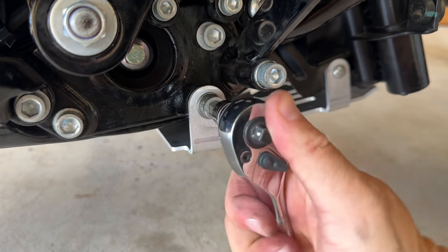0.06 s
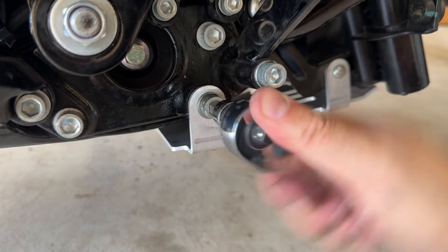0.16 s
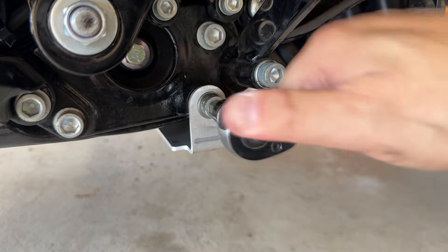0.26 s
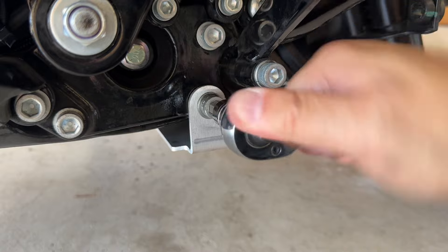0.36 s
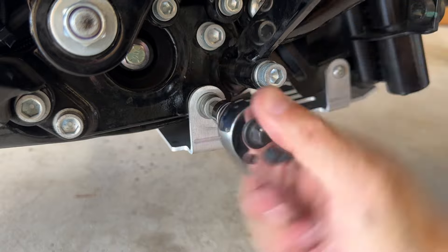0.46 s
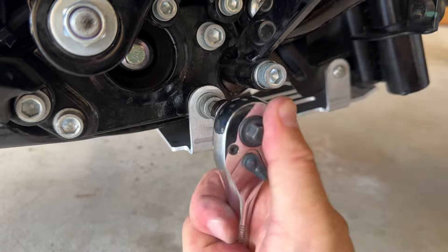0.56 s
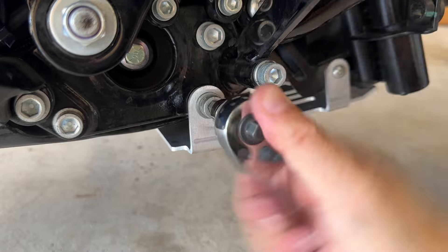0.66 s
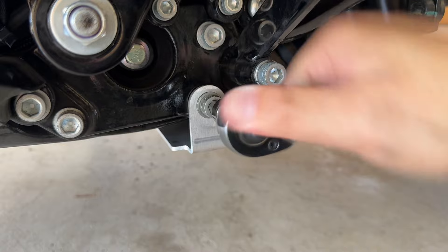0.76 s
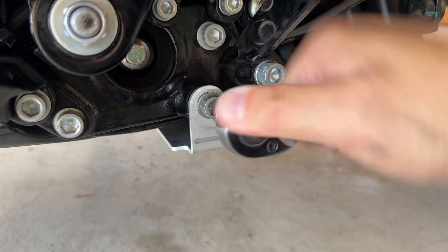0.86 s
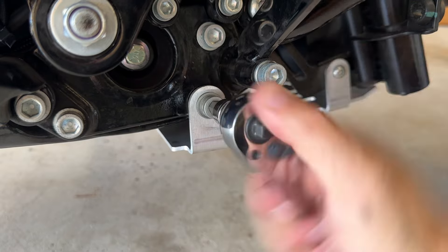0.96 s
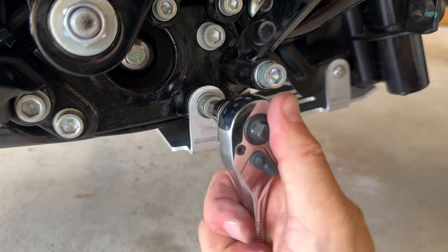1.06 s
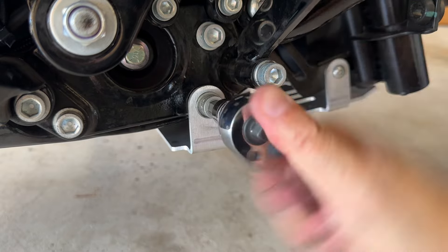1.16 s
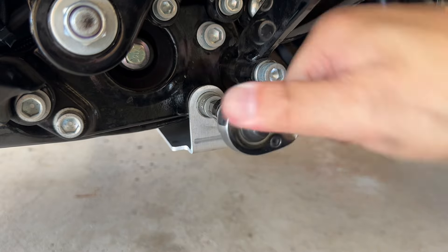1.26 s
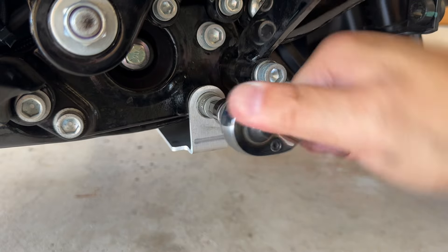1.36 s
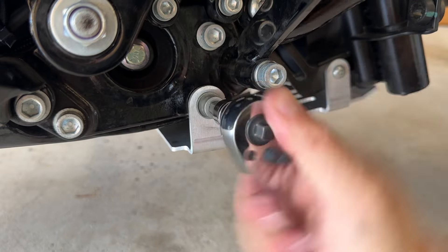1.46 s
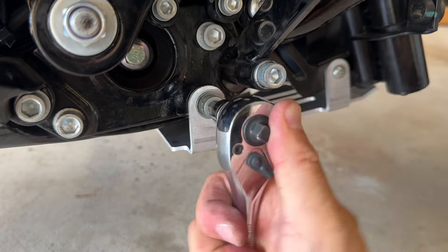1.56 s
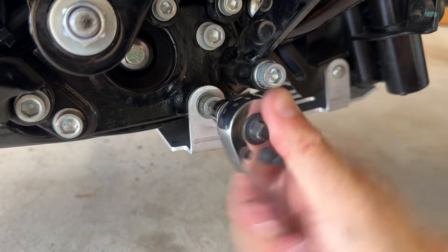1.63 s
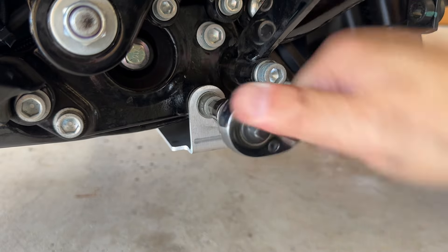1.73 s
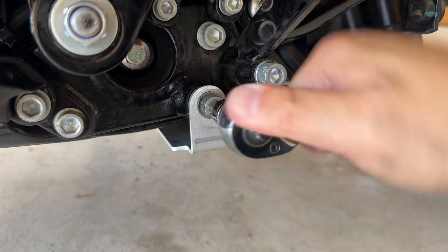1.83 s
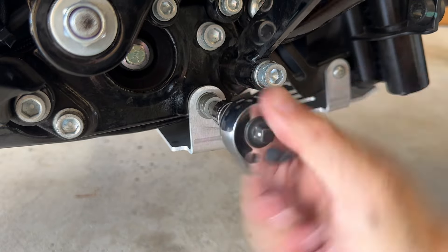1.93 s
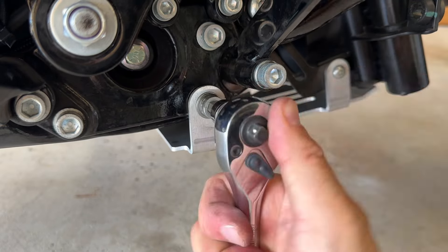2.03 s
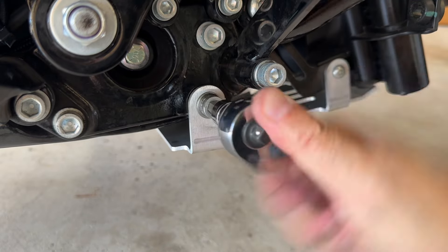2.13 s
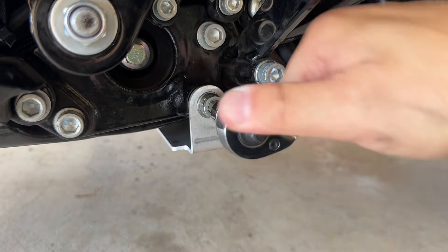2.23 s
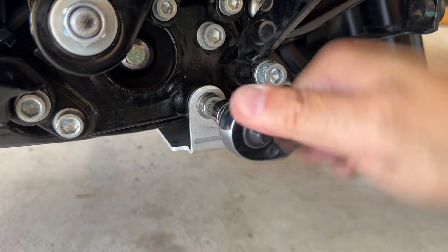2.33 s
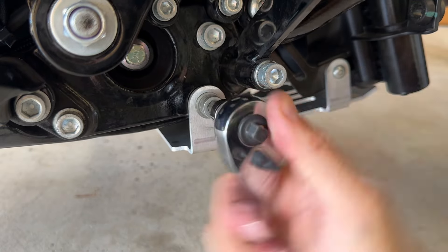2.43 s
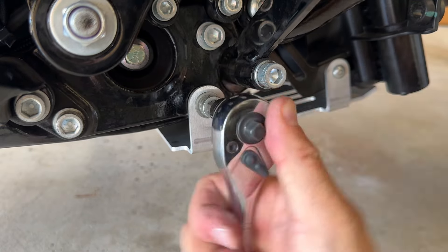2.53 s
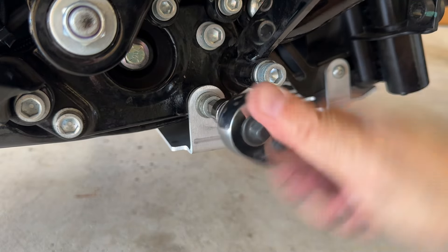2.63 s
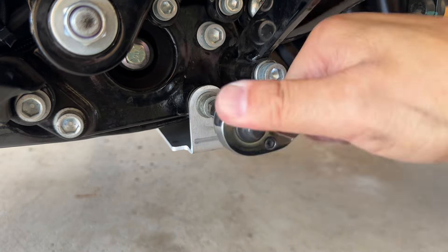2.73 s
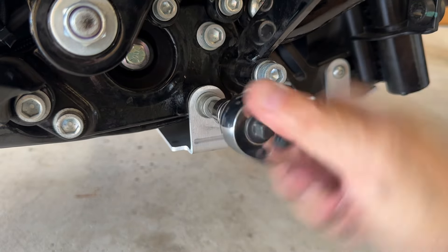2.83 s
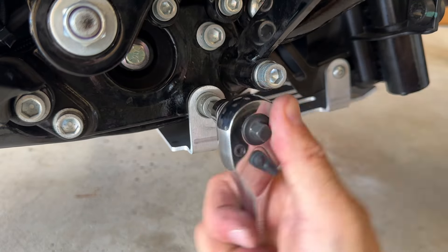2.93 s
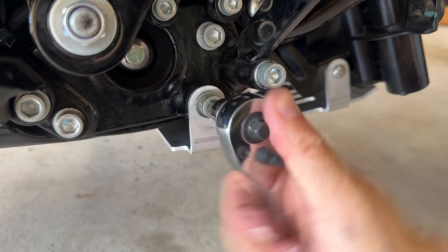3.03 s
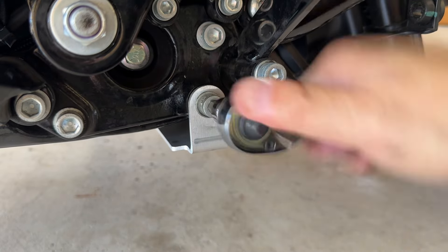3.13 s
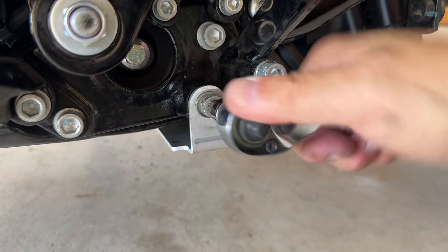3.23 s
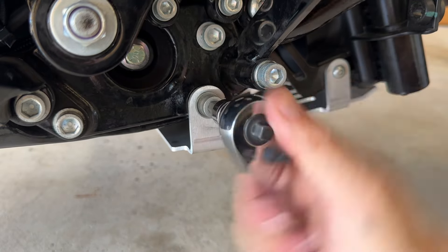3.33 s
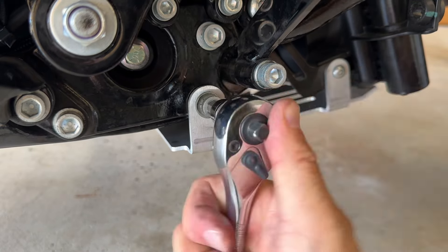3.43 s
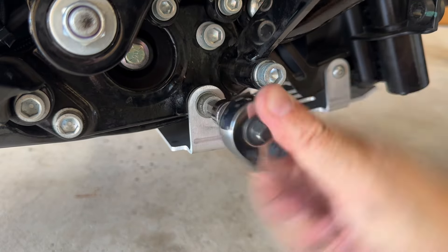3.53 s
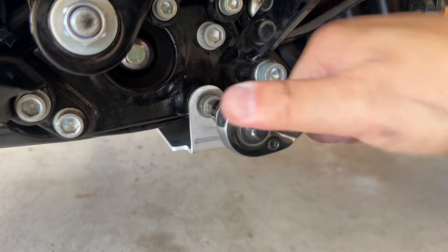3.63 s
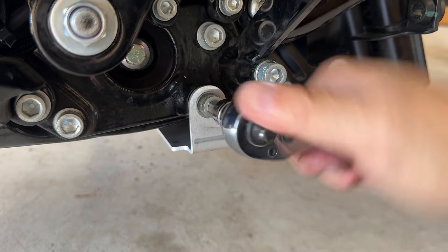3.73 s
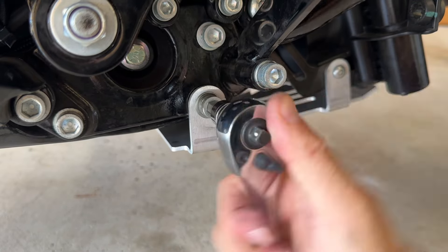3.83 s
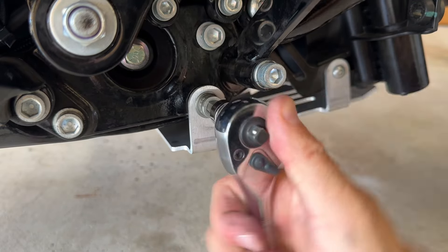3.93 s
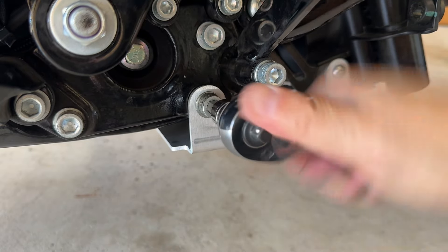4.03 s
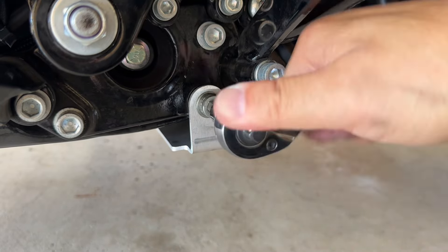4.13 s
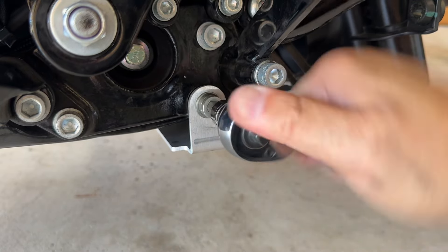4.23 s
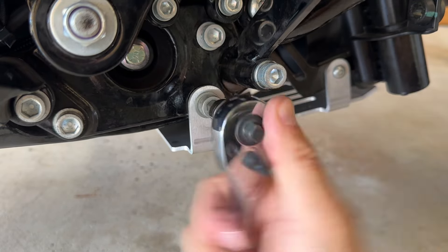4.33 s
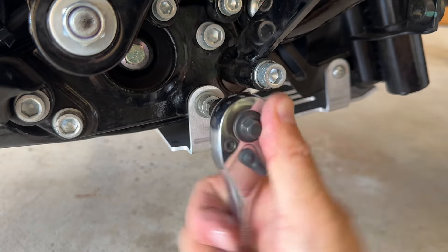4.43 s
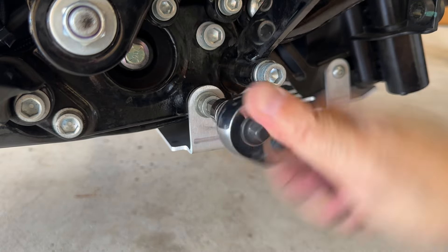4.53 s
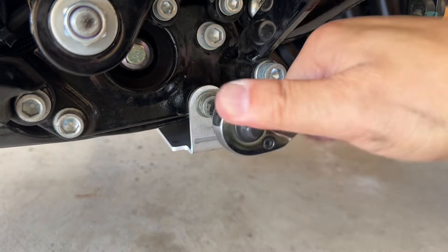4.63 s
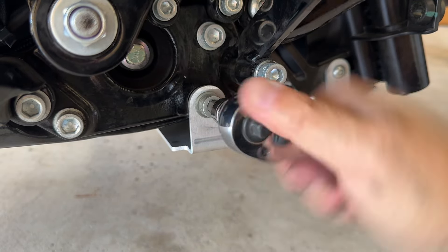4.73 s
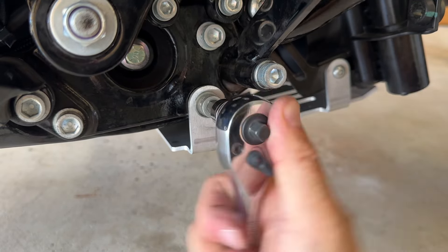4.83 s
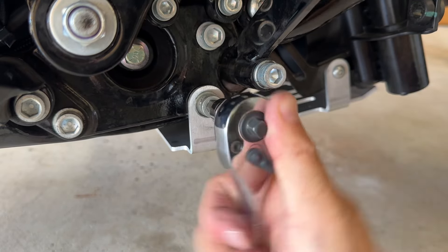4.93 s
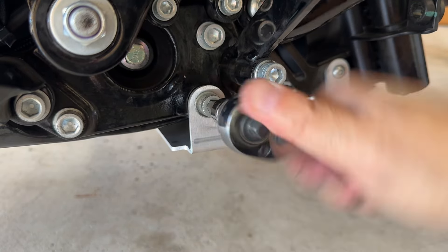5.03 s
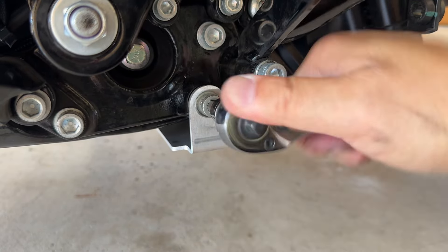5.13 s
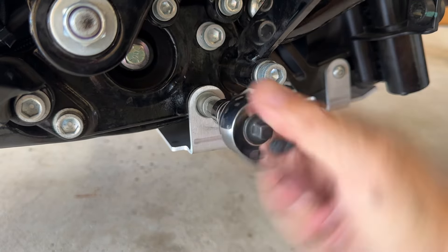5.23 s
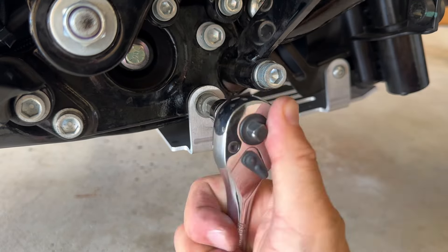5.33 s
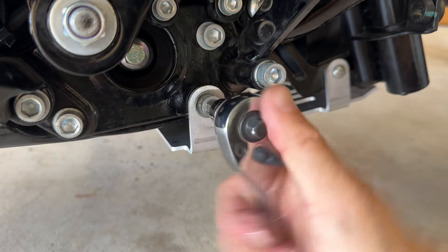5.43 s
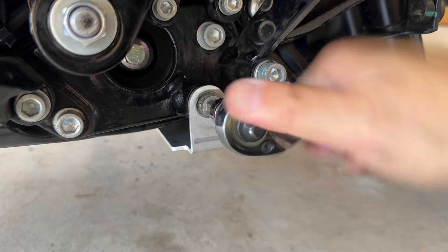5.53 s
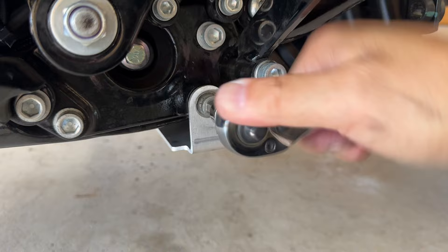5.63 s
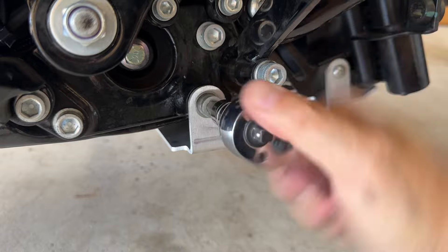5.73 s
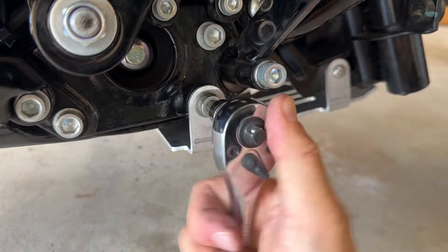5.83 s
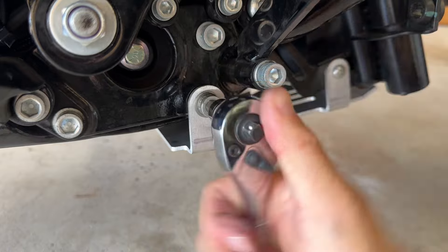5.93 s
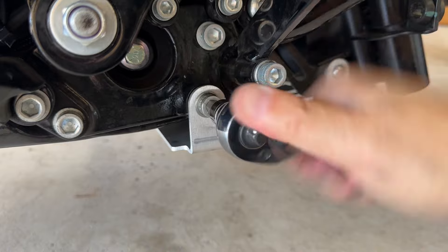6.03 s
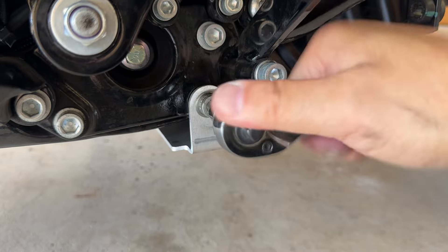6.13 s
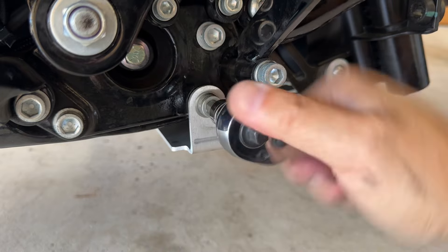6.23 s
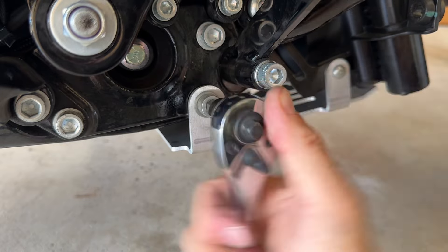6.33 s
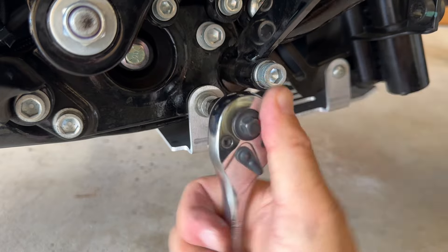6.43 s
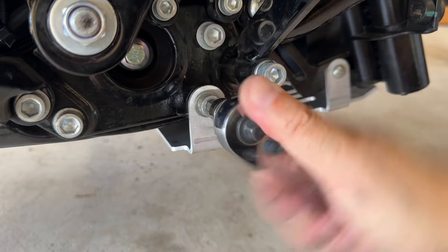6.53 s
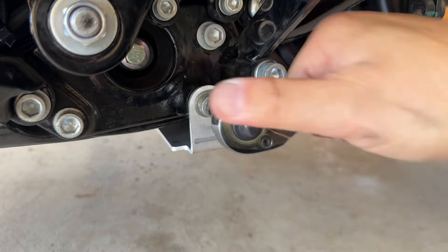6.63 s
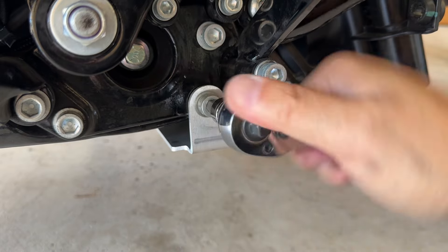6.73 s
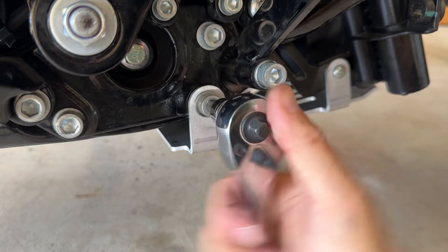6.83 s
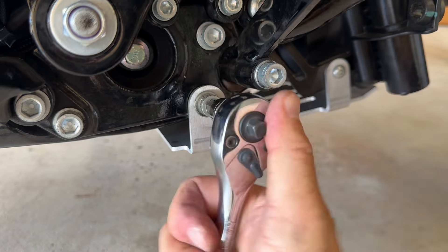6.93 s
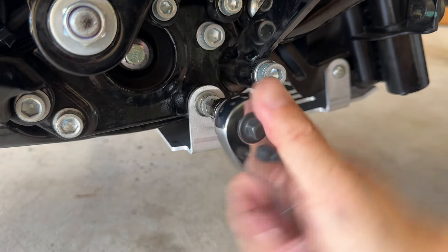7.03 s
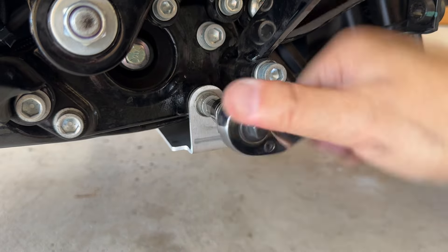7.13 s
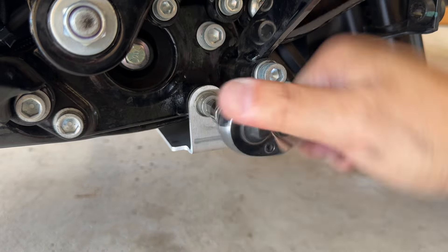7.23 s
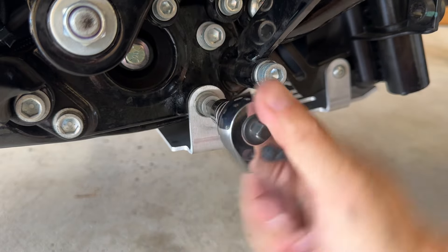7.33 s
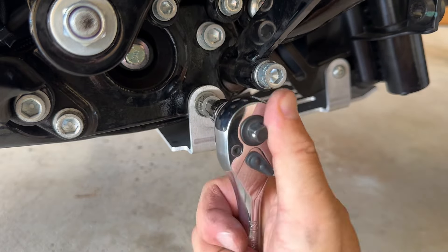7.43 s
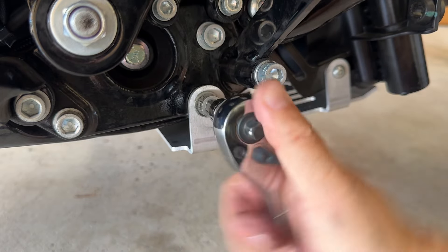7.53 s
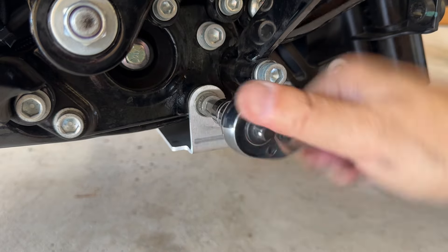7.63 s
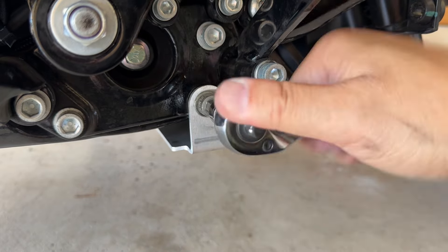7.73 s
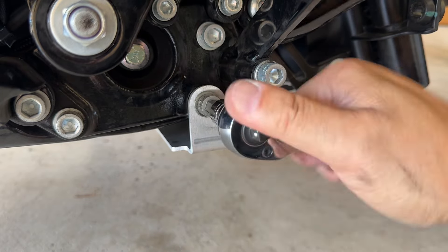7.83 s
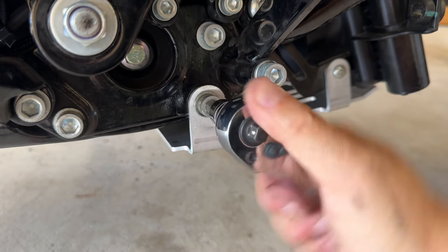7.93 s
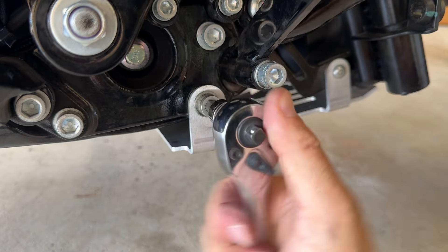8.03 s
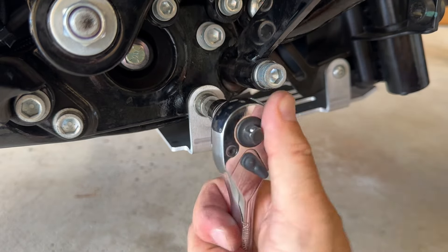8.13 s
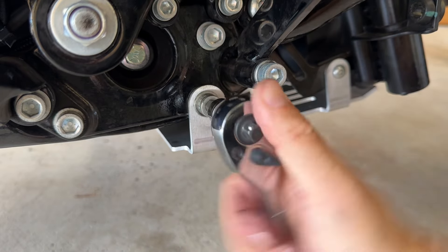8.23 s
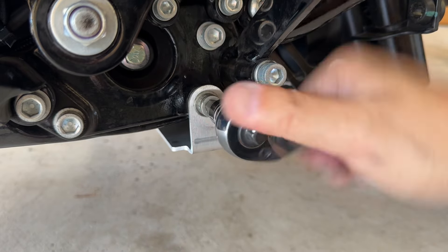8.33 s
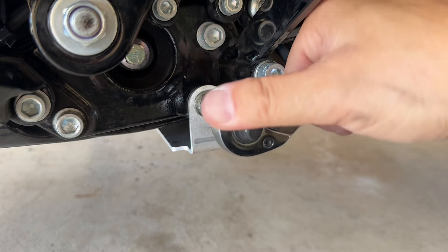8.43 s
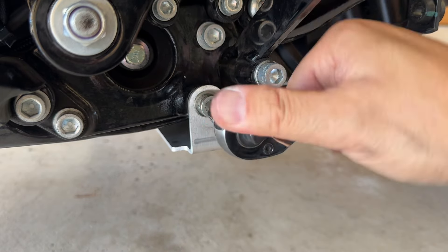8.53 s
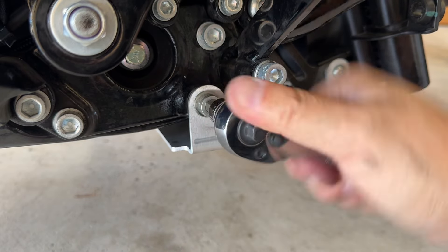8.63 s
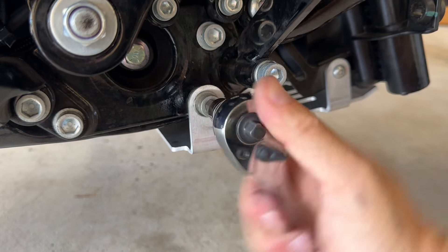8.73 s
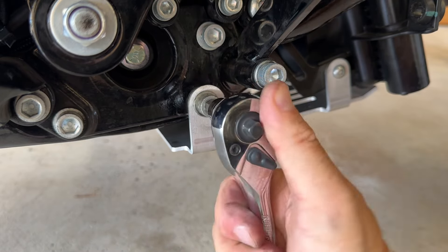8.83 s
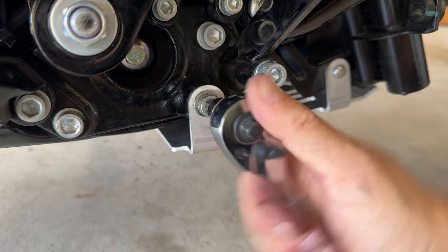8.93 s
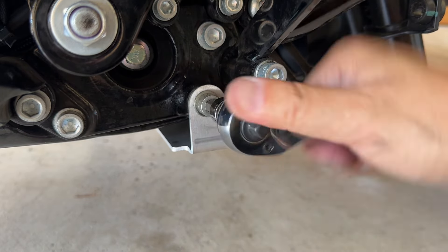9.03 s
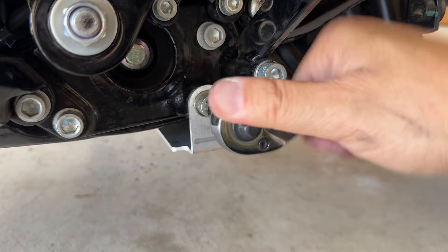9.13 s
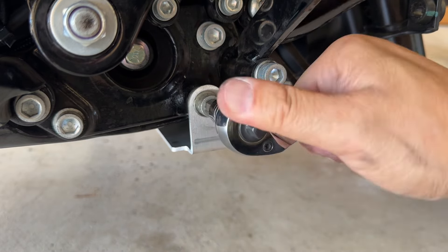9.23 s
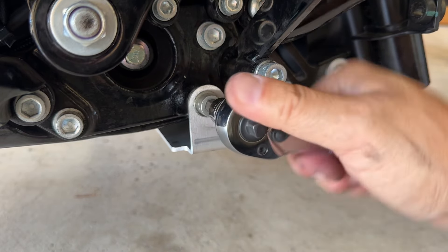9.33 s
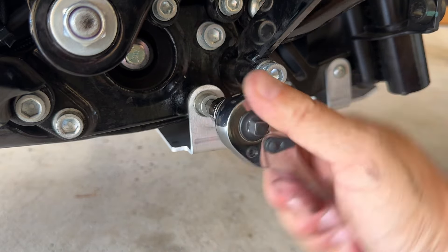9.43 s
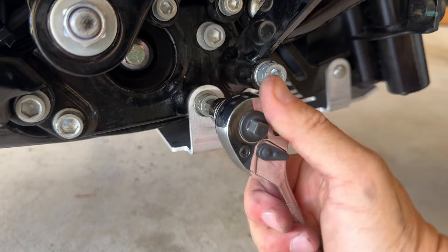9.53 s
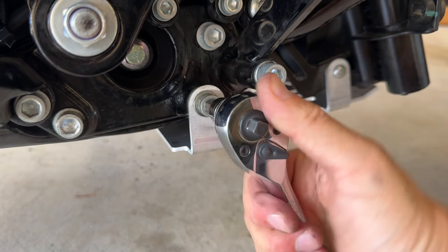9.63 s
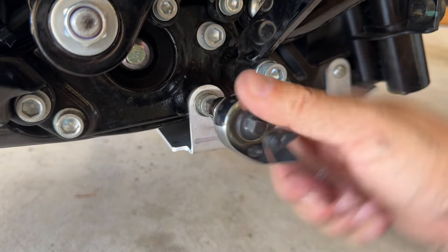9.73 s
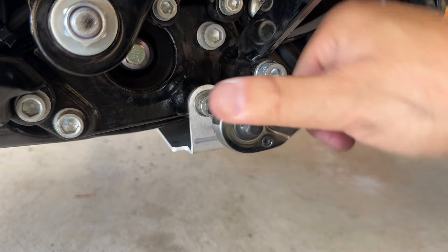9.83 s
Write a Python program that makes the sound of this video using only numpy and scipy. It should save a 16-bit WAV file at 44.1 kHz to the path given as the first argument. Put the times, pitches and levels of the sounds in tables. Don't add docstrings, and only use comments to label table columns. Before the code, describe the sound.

Regular zipping bursts of hard pawl clicks, each around an eighth of a second, come from a hand wrench tightening a bolt. The turning strokes between are nearly quiet, with small clunks as the drive takes up play and one rough grip shift near three seconds. The pace loosens towards the end. Close stereo pickup in a garage, short reflections, faint rumble and hum.

```python
import sys
import numpy as np
from scipy import signal
from scipy.fft import rfft, irfft, next_fast_len
from scipy.io import wavfile

SR = 44100
rng = np.random.default_rng(int(sys.argv[2]) if len(sys.argv) > 2 else 0)


def store_pcm(level_fs):
    pcm = np.round(np.clip(level_fs, -1, 1) * 32767).astype(np.int16)
    wavfile.write(sys.argv[1], SR, np.atleast_2d(pcm).T)


def boost_factor(decibels):
    exponent = np.asarray(decibels, float) / 20
    return 10 ** exponent


N = 435266

# hz, level_db_per_hz
ROOM_MID = [(18, -51), (30, -16), (101, 1.5), (346, -19.5), (658, -13.5), (885, -20), (1600, -16.5),
            (1900, -22.5), (7050, -36), (8180, -34.5), (8810, -67), (11000, -86), (14300, -109),
            (22000, -120)]
ROOM_SIDE = [(18, -50), (30, -14.5), (93, 1), (245, -6), (675, 1), (1560, -4.5), (1950, -9), (2150, -13.5),
             (8180, -21), (11000, -30.5), (14300, -50.5), (22000, -120)]
# centre_hz, width_hz, level_db
DRONE_BANDS = [(98.7, 17, -60), (202.4, 13.6, -64)]
# first_tooth_s, level_db, end_fade_db
STROKES = [(0.129, -15.5, 3.5), (0.623, -16, -2), (1.118, -16.5, -1), (1.612, -16, 2), (2.085, -16, 3.5),
           (2.561, -14, 4), (3.022, -16.5, -2.5), (3.484, -14, 5), (3.962, -14, 8), (4.453, -13.5, 2.5),
           (4.944, -15.5, 6), (5.418, -15.5, 3.5), (5.942, -16, 4.5), (6.467, -16.5, 0), (6.981, -16, 0),
           (7.522, -15, 0), (8.219, -15.5, 2.5), (8.916, -13.5, 5.5), (9.695, -15.5, 4)]
# time_s, level_db
CATCHES = [(0.169, -16), (0.22, -15), (0.668, -15.5), (0.74, -14.5), (1.146, -10.5), (1.621, -14.5),
           (1.657, -17), (1.716, -18), (2.116, -14), (2.189, -12.5), (2.598, -16), (2.67, -13.5),
           (3.049, -12.5), (3.096, -12), (3.53, -13), (3.968, -12), (4.036, -13.5), (4.463, -16),
           (4.523, -14), (5.026, -12), (5.458, -12.5), (5.974, -12), (6.491, -6.5), (6.564, -15),
           (7.029, -14), (7.105, -15), (7.595, -14), (8.293, -11.5), (8.986, -13), (9.718, -17.5)]
# time_s, level_db
LAST_BUT_ONE_TEETH = [(.241, -15), (.759, -15.5), (1.24, -12), (1.74, -19), (2.209, -16.5), (2.696, -17.5),
                      (3.14, -22), (3.607, -28), (4.066, -11.5), (4.587, -23), (5.07, -26), (5.548, -30),
                      (6.067, -16.5), (6.606, -16), (7.142, -11.5), (7.654, -25), (8.379, -28),
                      (9.056, -16), (9.814, -15)]
# time_s, level_db
LAST_TEETH = [(.257, -17.5), (.784, -11.5), (1.261, -11.5), (1.756, -12), (2.233, -16), (2.722, -9.5),
              (3.155, -14.5), (3.619, -21), (4.088, -21), (4.604, -23), (5.103, -14), (5.567, -16.5),
              (6.091, -14.5), (6.626, -24.5), (7.164, -16), (7.674, -21.5), (8.408, -9), (9.08, -19),
              (9.837, -15)]
# time_s, level_db, tilt_db_per_octave
TAKE_UPS = [(0.108, -38, -7.5), (0.481, -38.5, -1.5), (0.577, -23.5, -6.5), (1.093, -43.5, -12),
            (1.59, -39, -8.5), (2.033, -16, 0), (2.51, -20.5, -1.5), (2.997, -46.5, -10.5),
            (3.457, -31, -2.5), (3.937, -33.5, -3.5), (4.394, -47, -6.5), (4.412, -32.5, -8),
            (4.895, -39, -5.5), (4.917, -40, -1), (5.376, -36, -8), (5.393, -37, -7.5),
            (5.911, -38.5, -7.5), (5.933, -34, 1), (6.406, -21.5, -0.5), (6.432, -23, -2.5),
            (6.921, -63, -16), (6.939, -37.5, -6), (7.492, -43, -7), (7.501, -33, 0), (8.182, -35, -4.5),
            (8.862, -34, -4), (8.889, -38, -6), (9.664, -43, -6)]
# time_s, level_db, tilt_db_per_octave
SEATS = [(0.321, -34.5, -8), (0.851, -20.5, -4.5), (2.865, -41, 1), (3.218, -27.5, -7.5),
         (3.689, -36.5, -9.5), (4.143, -25, -6), (4.294, -51, -12), (4.656, -18.5, -5), (4.668, -21.5, -5),
         (5.626, -35, -8.5), (6.677, -20.5, -4.5), (7.209, -28.5, -7), (7.719, -13, 1), (7.949, -33.5, -9),
         (9.138, -24, -6)]
# mode_hz, level_db, t60_s, left_lead_rad
STEEL_MODES = [(1176, -13, 0.033, -0.7), (1592, -17.5, 0.11, 1.5), (2290, -12, 0.038, 0.2),
               (2424, -10.5, 0.071, 0.7), (2616, -19.5, 0.16, 1.5), (3324, -10, 0.056, 2),
               (3520, -20, 0.17, 2.7), (3851, -12, 0.0605, 4), (4130, -17, 0.091, 7.5),
               (4330, -7.5, 0.066, 2), (4650, -5.5, 0.028, 0.5), (4934, -2.5, 0.05, 0.64),
               (5410, -13.5, 0.063, 5.5), (5470, -26.5, 0.0223, -6.5), (6370, -10.5, 0.04, 0.5),
               (6914, -8, .04, 4), (6937, -7, 0.033, 0), (7700, -12, 0.07, 4.5), (9470, -9.5, 0.18, 5.5),
               (9534, -1.5, 0.027, 3), (10100, -20, 0.037, 6), (7350, -10, 0.026, 6.5), (7950, -4, 0.03, 5),
               (8700, -21.5, 0.059, 5), (8710, -8, 0.061, 7), (9980, 3, 0.027, 5), (10400, 0, 0.017, 7.5),
               (11170, -2.5, 0.02, 6), (11570, -15, 0.062, 1)]
# hz, level_db_per_hz
SNAP_MID = [(400, -18), (957, -15), (1590, -4.5), (2390, -7.5), (2850, -6.5), (4870, 2), (6910, -3),
            (7600, -12.5), (8800, -28), (9650, 11.5), (11200, -13), (11900, -13.5)]
SNAP_SIDE = [(400, -35.5), (1060, -14.5), (1920, -3), (2570, -31.5), (3240, -10.5), (5890, -17),
             (8350, 19.5), (11200, -9.5)]
# hz, t60_s
SNAP_T60 = [(600, 0.15), (2000, 0.055), (6000, .035), (12000, 0.033)]
# time_s, peak_db
PUFFS = [(0.24, -54), (0.9, -45), (2.28, -53), (2.8, -49), (3.21, -34.5), (3.41, -56), (3.71, -61.5),
         (3.98, -39.5), (4.3, -50), (5.0, -36.5), (5.09, -41.5), (5.17, -41), (5.52, -52), (5.66, -52.5),
         (6.02, -47.5), (6.27, -58), (7.83, -63.5), (8.27, -59), (9.04, -51), (9.17, -49)]
# time_s, peak_db
THUDS = [(0.41, -53), (0.79, -49.5), (2.2, -49.5), (2.33, -54.5), (2.66, -48.5), (3.21, -47), (3.71, -51.5),
         (4.07, -44.5), (4.67, -50), (5.0, -53), (5.17, -53), (5.52, -52), (5.66, -52.5), (6.18, -48),
         (6.76, -54), (7.31, -58.5), (7.83, -53), (8.55, -48.5), (9.15, -45.5), (9.865, -54)]
# start_s, length_s, start_db, end_db
RUBS = [
    (0.364, 0.19, -60, -47),
    (3.181, .29, -29.5, -37.5),
    (5.68, 0.27, -52, -55),
    (6.73, 0.21, -55.5, -55.5),
    (7.746, 0.069, -31.5, -51.5),
    (7.817, 0.15, -52, -52),
]
# low_hz, high_hz, level_db, side_share
RUB_BANDS = [(393, 820, 6.5, 0.65), (1030, 1580, 16, 0.3), (1820, 3750, 6.5, 1.6), (4270, 11000, 0.5, 0.81),
             (6920, 8900, -12, 11)]
# hz, left_minus_right_db
PORT_BALANCE = [(60, .6), (250, .6), (500, -.5), (1000, 2.8), (2000, 1.6), (4000, 4.4), (5800, 3.4),
                (7200, .4), (9500, .3), (12000, 3.2)]
# hz, sum_deficit_db, difference_deficit_db
WEAKER_LIMITS = [(1000, 12, 14), (2000, 8, 2.5), (2900, 0, 9), (3600, 6.5, 9), (5500, 7, 5), (7000, 6, 16),
                 (7800, 2.5, 18), (9200, 2.0, 20), (9900, 5, 20), (12000, 5.5, 20)]


def rms_one(x):
    return x / np.sqrt(np.mean(x ** 2) + 1e-20)


def at_hz(points, hz):
    table_hz, value = np.array(points).T
    return np.interp(np.log(hz), np.log(table_hz), value)


def band(x, low_hz, high_hz):
    return signal.sosfilt(signal.butter(2, [low_hz, high_hz], "band", fs=SR, output="sos"), x)


def coloured(spectrum):
    hz = np.maximum(np.fft.rfftfreq(N, 1 / SR), 1)
    return rms_one(irfft(rfft(rng.standard_normal(N)) * boost_factor(at_hz(spectrum, hz)), N))


def ports(mid, side):
    return np.array([mid + side, mid - side])


def drift(rate_hz):
    r = np.exp(-2 * np.pi * rate_hz * 100 / SR)
    white = rng.standard_normal(N // 100 + 502)
    slow = rms_one(signal.lfilter([1], [1, -2 * r, r * r], white)[500:])
    return np.interp(np.arange(N) / 100, np.arange(len(slow)), slow)


def smear(x, time_s):
    r = np.exp(-1 / (time_s * SR))
    return signal.lfilter([(1 - r) ** 2], [1, -2 * r, r * r], x)


def room_tone(mid_db=-50.5, side_db=-53.5, hum_hz=102.2, hum_db=-50):
    mid = boost_factor(mid_db + 2.1 * drift(7.5)) * coloured(ROOM_MID)
    hum_gain = boost_factor(hum_db + 0.99 * drift(1.7)) * 2 ** .5
    hum_phase = 2 * np.pi * hum_hz * np.arange(N) / SR + 0.87 * drift(2.5)
    mid = mid + hum_gain * np.sin(hum_phase)
    for hz, width_hz, level_db in DRONE_BANDS:
        drone = band(rng.standard_normal(N), hz - width_hz / 2, hz + width_hz / 2)
        mid = mid + boost_factor(level_db) * rms_one(drone)
    side = boost_factor(side_db + 1.4 * drift(3.4)) * coloured(ROOM_SIDE)
    return ports(mid, side)


def teeth_passed(fast_gap_s=.0105, slow_gap_s=.015, slowing=.6, gap_spread=.25, spread_db=1, clear_s=.007):
    rows = [CATCHES, LAST_BUT_ONE_TEETH, LAST_TEETH, np.array(STROKES)[:, :2]]
    catch_s = np.array(CATCHES)[:, 0]
    even_gaps_s = fast_gap_s + (slow_gap_s - fast_gap_s) * slowing ** np.arange(24)
    for (start_s, level_db, fade_db), (end_s, _) in zip(STROKES, LAST_BUT_ONE_TEETH):
        uneven, strength = rng.standard_normal((2, 24))
        s = end_s - np.cumsum(even_gaps_s * np.exp(gap_spread * uneven))
        progress = (s - start_s) / (end_s - start_s)
        tooth_db = level_db - fade_db * progress + spread_db * strength
        free = (s > start_s + clear_s) & (np.abs(s[:, None] - catch_s).min(axis=1) > clear_s)
        rows.append(np.transpose([s, tooth_db])[free])
    return np.concatenate(rows)


def pawl_bounces(per_s=240, bounce_db=-5.5, spread_db=2.2, settle_s=.022, end_fade_db=4.5, end_fade_s=.03):
    s = np.cumsum(rng.uniform(.55, 1.45, 6000)) / per_s
    s = s[s < N / SR]
    stroke = np.maximum(np.searchsorted(np.transpose(STROKES)[0], s) - 1, 0)
    start_s, level_db, fade_db = np.array(STROKES)[stroke].T
    end_s = np.array(LAST_TEETH)[stroke, 0]
    level_db = level_db - fade_db * (s - start_s) / (end_s - start_s)
    level_db -= end_fade_db * np.exp(np.minimum(s - end_s, 0) / end_fade_s)
    level_db += bounce_db + spread_db * rng.standard_normal(len(s))
    in_stroke = (s > start_s) & (s < end_s + settle_s)
    return np.transpose([s, level_db])[in_stroke]


def contacts():
    teeth, bounces = teeth_passed(), pawl_bounces()
    knocks = np.concatenate([TAKE_UPS, SEATS])
    time_s, level_db = np.concatenate([teeth, knocks[:, :2], bounces]).T
    tilt = np.concatenate([np.zeros(len(teeth)), knocks[:, 2], np.zeros(len(bounces))])
    return np.round(time_s * SR).astype(int), level_db, tilt


def strikes(blows, hz, spread_db, grip_db):
    at, level_db, tilt = blows
    chance_db = spread_db * rng.standard_normal(len(at)) + grip_db * drift(12.0)[at]
    octaves = np.log2(max(hz, 1300.0) / 7770.0)
    clicks = np.full(N, 1e-18)
    clicks[at] = boost_factor(level_db + tilt * octaves + chance_db)
    return clicks


def steel_ring(blows, ring_db=-14.5, rattle_s=0.00075, sway_rad=.6):
    out, jolts = np.zeros((2, N)), rng.standard_normal(N)
    for hz, mode_db, t60_s, lead in STEEL_MODES:
        clicks = strikes(blows, hz, spread_db=3.5, grip_db=2.5)
        rattle = np.sqrt(smear(clicks ** 2, rattle_s)) * jolts
        pole = boost_factor(-60 / (t60_s * SR)) * np.exp(2j * np.pi * hz / SR)
        ring = signal.lfilter([1], [1, -pole], rattle)
        half_lead = .5j * (lead + sway_rad * np.cos(lead / 2) * drift(3.0))
        out += boost_factor(mode_db) * np.imag([ring * np.exp(half_lead), ring * np.exp(-half_lead)])
    return out * boost_factor(ring_db)


def snap(blows, snap_db=-7.5, rise_s=0.00042):
    out, edges_hz = 0, np.geomspace(350, 13000, 16)
    white = rng.standard_normal((2, 2, N))
    for k, (low_hz, high_hz) in enumerate(zip(edges_hz, edges_hz[1:])):
        hz = np.sqrt(low_hz * high_hz)
        fall = boost_factor(-60 / (at_hz(SNAP_T60, hz) * SR))
        clicks = strikes(blows, hz, spread_db=2.5, grip_db=2.5)
        power = signal.lfilter([1], [1, -fall ** 2], clicks ** 2)
        mid, side = band(white[k % 2] * np.sqrt(smear(power, rise_s)), low_hz, high_hz)
        out = out + ports(mid * boost_factor(at_hz(SNAP_MID, hz)), side * boost_factor(at_hz(SNAP_SIDE, hz)))
    return out * boost_factor(snap_db)


def crack(blows, crack_db=-8.5, length_s=.0005, side_db=3.5):
    clicks = strikes(blows, 6000.0, spread_db=3.5, grip_db=1.5)
    power = smear(clicks ** 2, length_s) * length_s * SR
    mid, side = rng.standard_normal((2, N)) * np.sqrt(power)
    return boost_factor(crack_db) * ports(band(mid, 2190, 7560), band(side, 5500, 10700) * boost_factor(side_db))


def settling(settle_s=0.022, damp_s=0.0046, damp_db=-11, free_s=0.044):
    s = np.array(LAST_TEETH)[:, :1] + np.cumsum([settle_s, damp_s, damp_s, free_s])
    gain_db = np.tile([0, damp_db, damp_db, 0], len(LAST_TEETH))
    return boost_factor(np.interp(np.arange(N) / SR, s.ravel(), gain_db))


def garage(x, t60_s=0.33, wall_cut_hz=7400):
    size = next_fast_len(N + SR)
    turn = np.exp(-2j * np.pi * np.arange(size // 2 + 1) / size)
    dull = np.exp(-2 * np.pi * wall_cut_hz / SR)
    wall = (1 - dull) / (1 - dull * turn)
    response = np.zeros((2, size // 2 + 1), complex)
    lags = (rng.uniform(.007, 0.028, 16) * SR).astype(int)
    for k, lag in enumerate(lags):
        loop = boost_factor(-60 * lag / SR / t60_s) * wall * turn ** lag
        response[k % 2] += loop / (1 - loop) * (-1) ** (k // 2)
    return irfft(rfft(x, size) * response, size)[:, :N]


def swells(events, rest_db, rise_db_per_s, fall_db_per_s):
    t = np.arange(0, N + 100, 100) / SR
    s, peak_db = np.transpose(events)[:, :, None]
    level_db = peak_db - np.where(t < s, rise_db_per_s * (s - t), fall_db_per_s * (t - s))
    return np.interp(np.arange(N) / SR, t, boost_factor(np.maximum(level_db.max(axis=0), rest_db)))


def hand(own_share=0.1375):
    white = rng.standard_normal((2, 2, N)) * [[1], [own_share]]
    air_gain = swells(PUFFS, rest_db=-59.5, rise_db_per_s=222.5, fall_db_per_s=201)
    air = air_gain * rms_one(band(white[0], 55, 98.6))
    thud_gain = swells(THUDS, rest_db=-60, rise_db_per_s=196.5, fall_db_per_s=100.5)
    thud = thud_gain * rms_one(band(white[1], 87.3, 233))
    return ports(*(air + thud)) * 2 ** .5


def rubs(grain_db=3.0, gain_db=-6, patchy_db=2.6, edge_s=0.0067):
    gain, t = np.zeros(N), np.arange(N) / SR
    for start_s, length_s, start_db, end_db in RUBS:
        end_s = start_s + length_s
        fade = np.interp(t, [start_s - edge_s, start_s, end_s, end_s + edge_s], [0, 1, 1, 0])
        gain += boost_factor(np.interp(t, [start_s, end_s], [start_db, end_db])) * fade
    grains = rng.standard_normal((2, N)) * boost_factor(grain_db * rng.exponential(1, N))
    body = np.zeros((2, N))
    for low_hz, high_hz, band_db, side_share in RUB_BANDS:
        hiss = band(band(grains, low_hz, high_hz), low_hz, high_hz)
        body += hiss * boost_factor(band_db + patchy_db * drift(22.0)) * [[1], [side_share]]
    return boost_factor(gain_db) * gain * ports(*rms_one(body))


def scene():
    blows = contacts()
    wrench = settling() * (steel_ring(blows) + snap(blows)) + crack(blows)
    return wrench + boost_factor(-15) * garage(wrench) + rubs() + hand() + room_tone()


def silence_weaker(x, bins=20, faint_top_hz=8300, faint_top_db=-49.5, attack_db=9):
    hz, _, cells = signal.stft([x[0] + x[1], x[0] - x[1]], SR, nperseg=2048, noverlap=1024)
    starts = np.arange(0, len(hz), bins)
    power = np.add.reduceat(np.abs(cells) ** 2, starts, axis=1)
    mid_db, side_db = 10 * np.log10(power + 1e-20)
    centre_hz = hz[starts] + 200
    table = np.array(WEAKER_LIMITS)
    mid_limit_db, side_limit_db = [at_hz(table[:, [0, k]], centre_hz)[:, None] for k in (1, 2)]
    keep = np.array([side_db - mid_db < mid_limit_db, mid_db - side_db < side_limit_db])
    keep |= centre_hz[:, None] < 900
    keep[0] &= (centre_hz[:, None] < faint_top_hz) | (mid_db > faint_top_db)
    top_db = side_db[centre_hz > faint_top_hz].max(axis=0)
    keep[:, :, 1:] |= np.diff(top_db) > attack_db
    keep_cells = keep[:, np.arange(len(hz)) // bins]
    kept = signal.istft(cells * keep_cells, SR, nperseg=2048, noverlap=1024)[1]
    return ports(*kept[:, :N]) / 2


def low_pass(x):
    return signal.sosfilt(signal.butter(12, 13060, fs=SR, output="sos"), x)


def record(dry, overload=0.74, top_hz=12380):
    hz = np.maximum(np.fft.rfftfreq(N, 1 / SR), 1)
    half_db = at_hz(PORT_BALANCE, hz) / 2
    heard = irfft(rfft(dry) * boost_factor(np.array([half_db, -half_db])), N)
    heard = overload * np.tanh(heard / overload)
    heard = signal.sosfilt(signal.cheby2(16, 55.0, top_hz, fs=SR, output="sos"), heard)
    mix = silence_weaker(heard)
    return low_pass(mix)


dry = scene()
out = record(dry)
store_pcm(out)
```